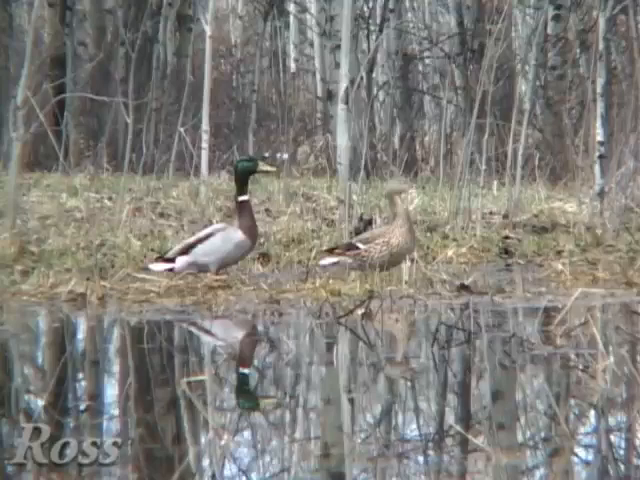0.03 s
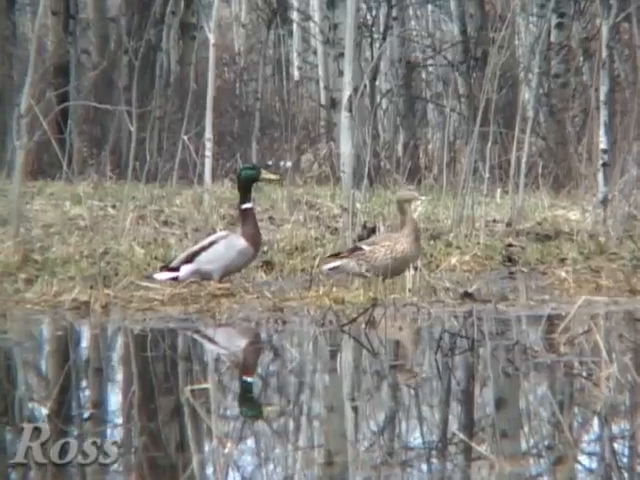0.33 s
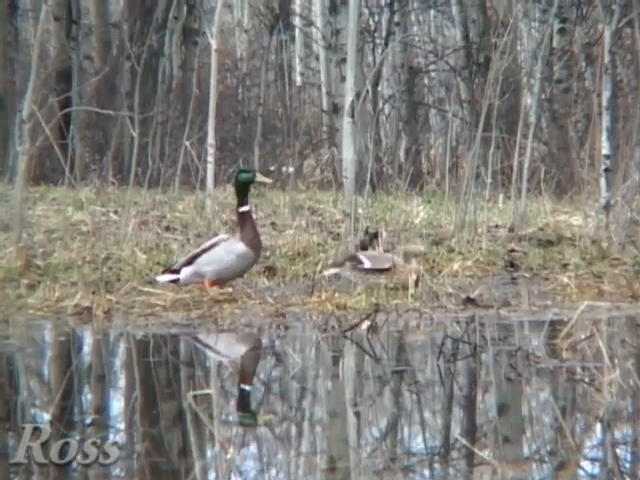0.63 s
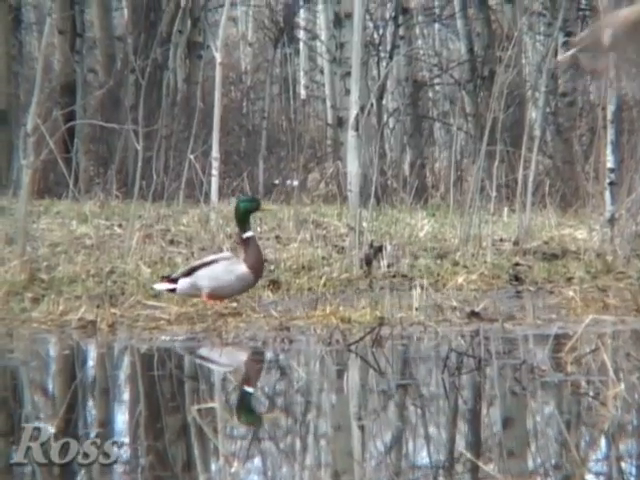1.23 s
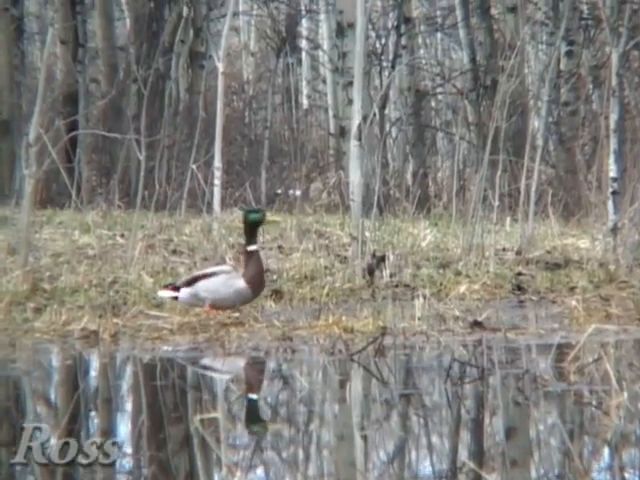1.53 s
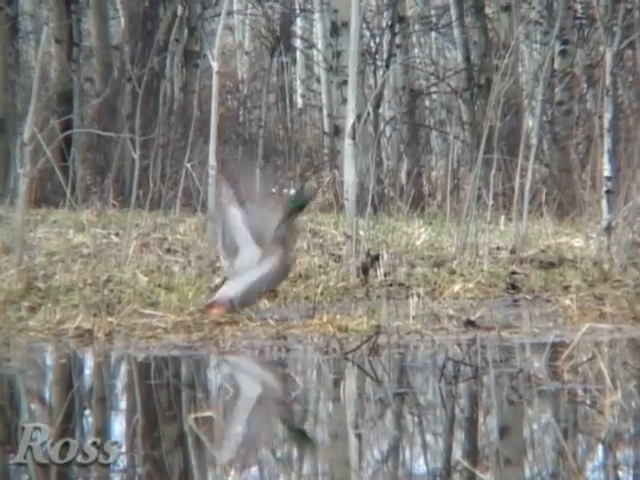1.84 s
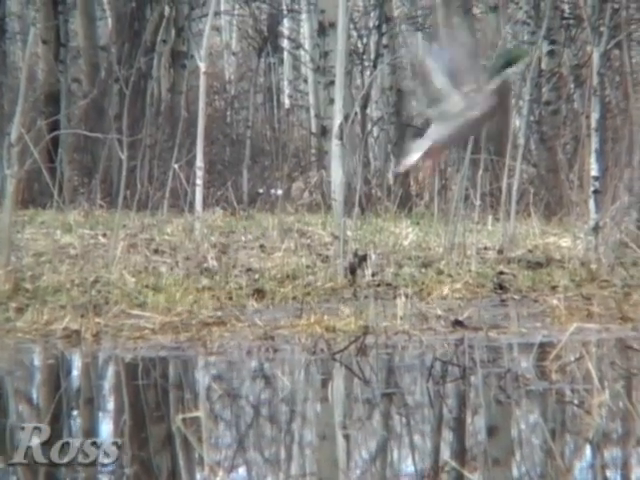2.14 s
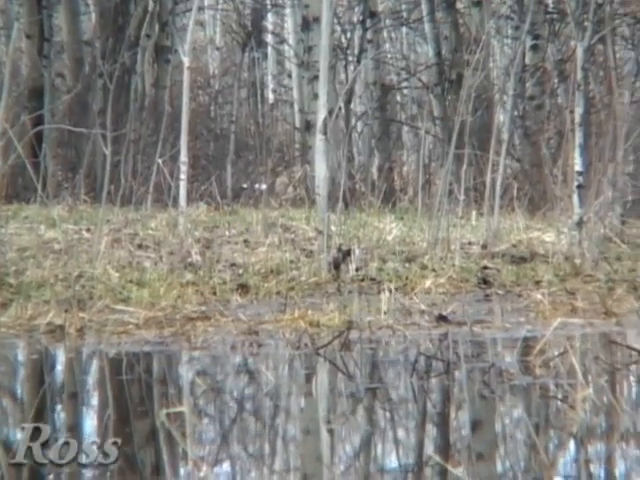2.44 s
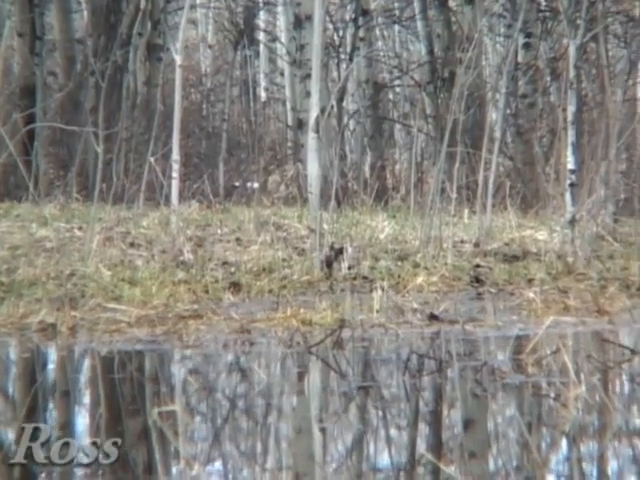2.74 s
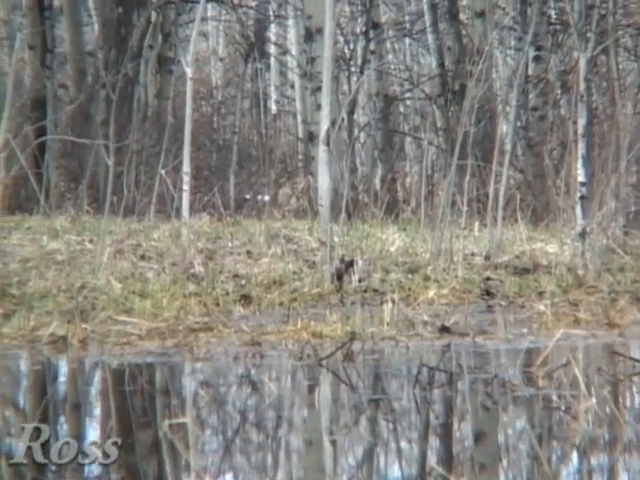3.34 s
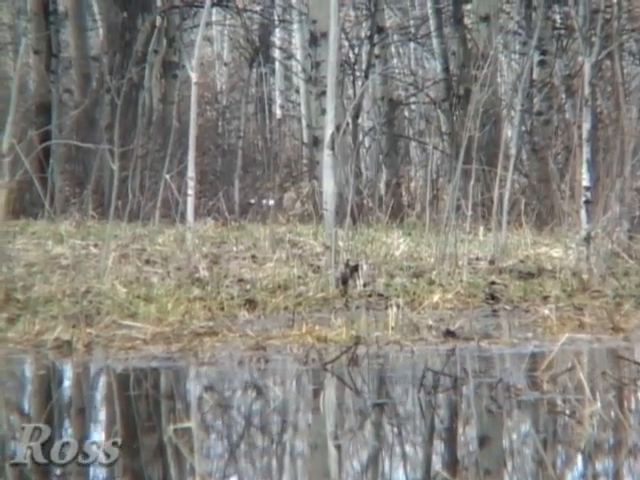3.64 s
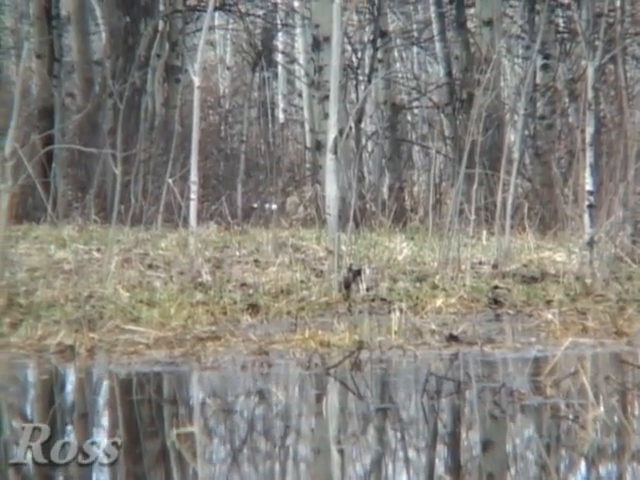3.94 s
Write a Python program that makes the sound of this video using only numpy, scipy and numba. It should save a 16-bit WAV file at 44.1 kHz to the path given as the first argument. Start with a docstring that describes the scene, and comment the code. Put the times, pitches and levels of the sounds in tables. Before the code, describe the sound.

Ducks quack harshly and fly off with flapping wings over a faint hiss.

```python
"""Two mallards leave a woodland pond. The drake rasps in reedy puffs; the hen grunts twice and takes
off with a scuff, wings whooshing down and whistling up. He leaps after her. In flight she gives three
short barks, then three harsh quacks, pulses of her syrinx ringing throat and bill, as the wings recede.
Tree trunks scatter it all. The scene sits on the left; both sides hiss, and a low hum comes and goes."""
import sys
import numpy as np
from scipy import signal
from scipy.fft import rfft, irfft
from scipy.io import wavfile
from scipy.ndimage import uniform_filter1d
from numba import njit

SR = 44100
rng = np.random.default_rng(int(sys.argv[2]) if len(sys.argv) > 2 else 0)


def bounce(signal):
    """Save signal as a 16-bit WAV file at the path given by the first command-line argument."""
    frames = np.transpose(np.atleast_2d(signal))
    limited = np.clip(frames, -1, 1)
    pcm = np.round(limited * 32767).astype(np.int16)
    wavfile.write(sys.argv[1], SR, pcm)


N = 4 * SR


def undb(db):
    """Decibels to gain."""
    return 10 ** (np.asarray(db) / 20)


def unit(x):
    """Scale to rms 1."""
    return x / np.sqrt(np.mean(x ** 2) + 1e-18)


def add(out, start, x):
    """Mix x in at start [s]."""
    i = max(int(start * SR), 0)
    out[i:i + len(x)] += x[:len(out) - i]


def noise(colour, size):
    """Noise of rms 1, shaped by an EQ curve of (frequency [Hz], level [dB])."""
    hz, db = np.array(colour, float).T
    bins = np.maximum(np.fft.rfftfreq(size, 1 / SR), 1)
    eq = undb(np.interp(np.log(bins), np.log(hz), db))
    return unit(irfft(rfft(rng.standard_normal(size)) * eq, size))


@njit
def svf(x, hz, width):
    """State-variable band-pass with a moving centre."""
    y, band_state, low_state = np.empty(len(x)), 0., 0.
    for i in range(len(x)):
        g, damping = np.tan(np.pi * hz[i] / SR), width / hz[i]
        v = (band_state + g * (x[i] - low_state)) / (1 + g * (g + damping))
        band_state, low_state = 2 * v - band_state, low_state + 2 * g * v
        y[i] = damping * v
    return y


def band(x, hz, width):
    """A resonance applied twice, for steep skirts."""
    hz = hz * np.ones(len(x))
    return svf(svf(x + 1e-18, hz, float(width)), hz, float(width))


def swell(t, rise, fall):
    """A bell around t = 0 with its own rise and fall times."""
    return np.exp(-.5 * (t / np.where(t < 0, rise, fall)) ** 2)


def hiss():
    """A bass-heavy noise floor, independent on each side."""
    # hiss EQ: (frequency [Hz], level [dB])
    colour = [(20, -3), (70, 15.5), (125, 18.5), (250, 8.5), (1000, 0), (6000, -3.5), (12900, -4.5),
              (13400, -8.5), (16000, -13)]
    return undb(-71.5) * np.array([noise(colour, N), noise(colour, N)])


def hum():
    """Two low tones that switch on and off together."""
    # hum gate: (on [s], off [s])
    spans = [(.06, .33), (.79, 1.76), (2.335, 4.1)]
    # hum tones: (frequency [Hz], level [dB])
    tones = [(30, -69), (90, -73)]
    t = np.arange(N) / SR
    gate = uniform_filter1d(sum(1. * ((t > on) & (t < off)) for on, off in spans), size=600)
    return gate * sum(undb(db) * np.sqrt(2) * np.sin(2 * np.pi * (hz * t + rng.random()))
                      for hz, db in tones)


def woods():
    """The dark, steady bed of the quiet wood."""
    # ambience EQ: (frequency [Hz], level [dB])
    colour = [(40, -8.5), (130, -1), (220, 12), (290, 1.5), (600, -4.5), (1300, -1), (3000, -37),
              (16000, -70)]
    return undb(-67) * noise(colour, N)


def trunks(x):
    """Reverb: quick scatter from ground and water, and a long tail from the trees."""
    # reverb EQ: (frequency [Hz], level [dB])
    colour = [(100, -5), (500, 1.5), (1800, 3), (3000, -0.5), (6000, 7), (15000, -2)]
    t = np.arange(N // 2) / SR

    def tail(t60):
        return unit(noise(colour, len(t)) * undb(-60 * t / t60)) / np.sqrt(len(t))
    return signal.fftconvolve(x, undb(-10.5) * tail(t60=.895) + undb(-18) * tail(t60=.04))[:N]


def take_offs():
    """The air thump of the drake's leap; feet and wing tips scuffing wet grass and water."""
    # scuff hits: (time [s], level [dB], decay [s])
    scuffs = [(.908, -48, 0.00212), (1.977, -44.5, 0.00524), (2.071, -55, 0.0217)]
    # scuff EQ: (frequency [Hz], level [dB])
    colour = [(200, -23.5), (600, 10.5), (2000, 8), (4500, 9), (16000, -30.5)]
    t = np.arange(N) / SR
    leap_s, attack_s = 2.06, .00093
    thump = unit(band(rng.standard_normal(N), hz=137.8, width=58.6))
    out = undb(-57) * swell(t - leap_s, rise=.017, fall=.017) * thump
    t = t[:N // 20]
    attack = np.minimum(t / attack_s, 1)
    for start, db, decay in scuffs:
        add(out, start, undb(db) * attack * np.exp(-t / decay) * noise(colour, len(t)))
    return out


def air_rush():
    """Air streaming through feathers, a continuous layer under the wingbeats."""
    # fader curve: (time [s], level [dB])
    fader = [(0, -72.5), (.8, -70), (.92, -61.5), (1.85, -62), (2.1, -55), (2.4, -58.5), (2.9, -58.5),
             (3.601, -62.5), (4, -61.5)]
    # rush EQ: (frequency [Hz], level [dB])
    colour = [(100, -8.5), (220, 5.5), (500, 9), (1000, 0.5), (2300, 0.5), (3500, -5.5), (6000, -9.5),
              (8000, -20.5), (12000, -21), (16000, -66)]
    return undb(np.interp(np.arange(N) / SR, *np.array(fader).T)) * noise(colour, N)


def wings():
    """Downstrokes are falling whooshes with a rustle; flight feathers whistle on the way up."""
    # near downstrokes: (time [s], relative level [dB])
    beats = [(0.982, -49), (0.992, -50.5), (1.079, -48.5), (1.173, -49), (1.27, -50.5), (1.361, -48.5),
             (1.453, -46), (1.547, -48.5), (1.634, -49), (1.722, -51.5), (1.819, -55), (1.913, -56),
             (2.008, -49.5), (2.109, -49), (2.207, -49), (2.305, -46.5), (2.401, -50.5), (2.499, -47.5)]
    # feather rustle EQ: (frequency [Hz], level [dB])
    feathers = [(200, -13.5), (700, 9.5), (1200, 13.5), (2800, 15.5), (4400, 17), (6200, 10), (8000, 1.5),
                (12000, -6), (16000, -52.5)]
    # near upstroke whistles: (time [s], low tone [dB], high tone [dB])
    whistles = [(0.931, -60, -79), (1.303, -63, -56), (1.394, -59.5, -60), (1.49, -64, -66),
                (1.582, -63, -65), (1.686, -58, -69.5), (1.855, -65, -65.5), (2.24, -57.5, -72),
                (2.342, -56.5, -75), (2.441, -60, -61.5), (2.54, -77, -61.5)]
    # whooshes: (centre [Hz], width [Hz], downward sweep [1/s], fall [s])
    hen_whoosh, drake_whoosh = (485.6, 437, 10.3, .0069), (555.5, 463, 39.7, .00951)
    drake_flies_s, peak_delay_s, rise_s, upstroke_s = 1.95, .0045, .0043, .045
    far_from_s, period_s, fade_db_per_s = 2.863, .101, 10  # even beats, receding
    far_times = np.arange(far_from_s, N / SR - period_s, period_s)
    far_beats = [(s, -55.5 - fade_db_per_s * (s - far_from_s)) for s in far_times]
    out = np.zeros(N)
    t = np.arange(-.04, .06, 1 / SR)
    for time, db in beats + far_beats:
        hz, width, sweep, fall = drake_whoosh if time > drake_flies_s else hen_whoosh
        air = unit(band(rng.standard_normal(len(t)), hz * np.exp(-sweep * t), width))
        whoosh = undb(db + 1) * air * swell(t, rise_s, fall)
        rustle = undb(db - 10.5) * noise(feathers, len(t)) * swell(t, rise_s, fall=.0094)
        add(out, time + peak_delay_s + t[0], whoosh + rustle)
    whistle_hz, glide_per_s = (4240, 4850), 2.3
    far_whistles = [(s + upstroke_s, rng.normal(-65.5, 2.5)) for s in far_times]  # low tone only
    for time, *tones_db in whistles + far_whistles:
        for hz, db in zip(whistle_hz, tones_db):
            air, detune = rng.standard_normal(len(t)), rng.normal(0, .025)
            tone = unit(band(air, hz * np.exp(glide_per_s * t + detune), width=453))
            add(out, time + t[0], undb(db) * tone * swell(t, rise=.00723, fall=.00723))
    return signal.sosfilt(signal.butter(2, 195.7, "high", fs=SR, output="sos"), out)


def drake_rasps():
    """Reedy puffs of noise ring his throat; its higher resonances speak a little later."""
    # rasps: (start [s], length [s], puff rate [Hz], relative level [dB])
    rasps = [(.075, .315, 69.5, -48.5), (.811, .062, 80, -40), (1.626, .046, 82, -40)]
    # his throat resonances: (frequency [Hz], half-width [Hz], level [dB])
    throat = [(1483.5, 162, 2), (1877.7, 242, 5), (2419.6, 127, 5), (2958, 510, -5.5), (4900, 1800, -14.5)]
    edge_db, arch_db, lag_s_per_khz = -27, 6, .002
    out = np.zeros(N)
    for start, length, rate, db in rasps:
        t = np.arange(int(length * SR)) / SR
        from_puff_s = ((t * rate + .5) % 1 - .5) / rate
        puffs = swell(from_puff_s, rise=.00181, fall=.00362) * rng.standard_normal(len(t))
        arch = undb(db + edge_db + arch_db * np.sin(np.pi * t / length))
        for hz, half_width, formant_db in throat:
            lag = lag_s_per_khz * (hz - throat[0][0]) / 1000
            add(out, start + lag, undb(formant_db) * arch * unit(band(puffs, hz, 2 * half_width)))
    return out


def syrinx(pitch, jitter, throat, formant_scale, tilt_db_per_octave=0):
    """Uneven strong-weak pulses, each with a puff of air, ring the hen's wavering throat resonances."""
    limp, shimmer_db, air_db, air_cycles = .2, 1.9, -14, .25
    waver_depth, waver_per_s, pivot_hz = .024, 40, 2038
    size = len(pitch)
    pulses, breath, voice = np.zeros((3, size))
    chance = rng.standard_normal((200, 2))  # per pulse: timing, level
    jitter = jitter * np.ones(size)
    at, k = 0., 0
    while at < size - 1:
        i, alternate = int(at), (-1) ** k
        period = SR / pitch[i]
        pulses[i] = (1 + limp * alternate) * undb(shimmer_db * chance[k, 1])
        breath[i:] = pulses[i] * np.exp(-np.arange(size - i) / (period * air_cycles))
        at += period * max(1 + jitter[i] * (chance[k, 0] + .5 * alternate), .5)
        k += 1
    source = unit(pulses) + undb(air_db) * unit(breath * rng.standard_normal(size))
    for hz, half_width, db in throat:
        drift = np.interp(np.arange(size) / SR * waver_per_s, np.arange(20), rng.standard_normal(20))
        centre = hz * formant_scale * (1 + waver_depth * drift)
        tilt_db = tilt_db_per_octave * np.clip(np.log2(hz / pivot_hz), -.5, .5)
        voice += undb(db + tilt_db) * band(source, centre, 2 * half_width)
    return unit(voice)


def hen_short_calls():
    """Rough bursts of the syrinx: soft grunts on the bank, clipped barks in flight."""
    # calls: (start [s], length [s], level [dB])
    grunts = [(.392, 0.015, -59), (.634, 0.0204, -53.5)]
    barks = [(2.058, 0.0341, -41), (2.102, 0.0278, -43), (2.154, 0.0227, -43)]
    # her throat resonances: (nominal frequency [Hz], half-width [Hz], level [dB])
    grunt_throat = [(522, 355, 1.5), (1244, 400, -1), (2077, 116, 3.5), (4220, 260, -8)]
    bark_throat = [(445, 179, -12), (1880, 196, 2.5), (2144.5, 124, -0.5), (5400, 580, -24.5)]
    grunt_hz, bark_hz, edge_s = 313.5, 233.56, .00199
    out = np.zeros(N)
    for calls, hz, throat in ((grunts, grunt_hz, grunt_throat), (barks, bark_hz, bark_throat)):
        for start, length, db in calls:
            t = np.arange(int((length + edge_s) * SR)) / SR
            envelope = (1 - np.exp(-t / edge_s)) * np.clip((t[-1] - t) / edge_s, 0, 1)
            voice = syrinx(np.full(len(t), hz), jitter=.065, throat=throat, formant_scale=.9822)
            add(out, start, undb(db) * envelope * voice)
    return out


def hen_quacks():
    """Long, bending calls, clearest where loudest; the resonances sink while the bill is nearly shut."""
    # one curve per quack: (time [s], level [dB], brightness [relative dB], pitch [Hz])
    quacks = [
        [(2.518, -52.5, 8.5, 130.9), (2.54, -43.5, -9.5, 202.6), (2.562, -42, 8.5, 267.6),
         (2.61, -39.5, 5.5, 279.4), (2.648, -40.5, 5.5, 238.5), (2.668, -36.5, 20, 292.3),
         (2.688, -41.5, -1, 334), (2.712, -39, 0, 262.7), (2.74, -52.5, 0, 225.7)],
        [(3.1, -53, -7, 198.9), (3.128, -41, -3.5, 264.8), (3.178, -39.5, -3, 262.8), (3.208, -39.5, 2, 298.3),
         (3.255, -41, 0, 289.8), (3.286, -37, 5.5, 257.1), (3.312, -41, -4.5, 284), (3.328, -53.5, -4.5, 222.6)],
        [(3.742, -51, 1.5, 129.5), (3.787, -45, -6, 267.1), (3.835, -43, 3, 262.3), (3.856, -43, 3, 286.4),
         (3.895, -42.5, 0.5, 304.7), (3.922, -48, 3.5, 277), (3.95, -40, 3, 258.7), (3.982, -49, 9, 216.7)],
    ]
    # throat and bill resonances per quack: (frequency [Hz], half-width [Hz], level [dB])
    throats = [
        [(427.3, 133, -4.5), (1330, 411, -1.5), (1510, 141, -1.5), (1741.6, 154, 7), (2309, 175, 3),
         (2918, 89, -2), (4550, 276, -11)],
        [(365.6, 73, 1.5), (1169, 189.4, 9.5), (1494, 38.2, 14.5), (2005, 323, 12), (2266, 160, 12),
         (3900, 300, -17.5), (6114, 255, -9)],
        [(343, 320, -13.5), (995, 215, -1), (1191, 110.6, 1), (1812, 96, 10.5), (2366, 209, 6), (2851, 40, -1),
         (4180, 850, -30.5), (5990, 440, -22)],
    ]
    bill_drop, open_s, shut_s = .4214, .00933, .01096
    clear_jitter, rough_jitter, clear_range_db = .015, .065, 4
    out = np.zeros(N)
    for curve, throat in zip(quacks, throats):
        times, *columns = np.array(curve, float).T
        t = np.arange(times[0], times[-1], 1 / SR)
        db, brightness, pitch = (np.interp(t, times, column) for column in columns)
        closure = np.exp((times[0] - t) / open_s) + np.exp((t - times[-1]) / shut_s)
        jitter = np.interp(db.max() - db, [0, clear_range_db], [clear_jitter, rough_jitter])
        tilt = .727 * (brightness - brightness.mean())
        add(out, times[0], undb(db) * syrinx(pitch, jitter, throat, 1 - bill_drop * closure, tilt))
    return out


def scene():
    """The ducks, their reverb and the quiet wood, panned hard left."""
    left_db, right_db = 5, -48
    ducks = hen_short_calls() + hen_quacks() + drake_rasps() + wings() + air_rush() + take_offs()
    return undb([[left_db], [right_db]]) * (ducks + trunks(ducks) + woods())


def record(dry):
    """Add hum and hiss, fade in after a moment of silence and cut the top."""
    silence_s, fade_s, top_hz = .05164, .0156, 15400
    fade_in = np.clip((np.arange(N) / SR - silence_s) / fade_s, 0, 1)
    high_cut = signal.ellip(8, .2, 70, top_hz, fs=SR, output="sos")
    return signal.sosfilt(high_cut, (dry + hum() + hiss()) * fade_in)


dry = scene()
out = record(dry)
bounce(out)
```